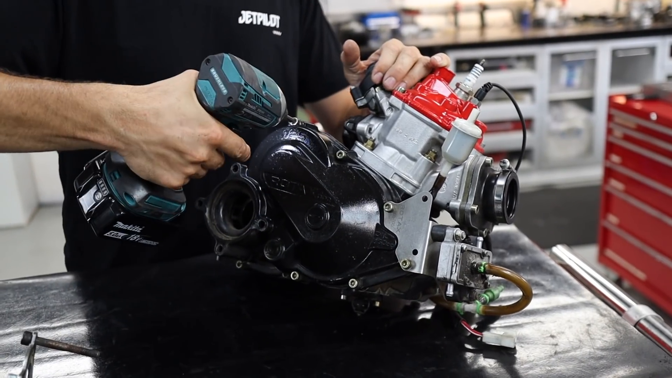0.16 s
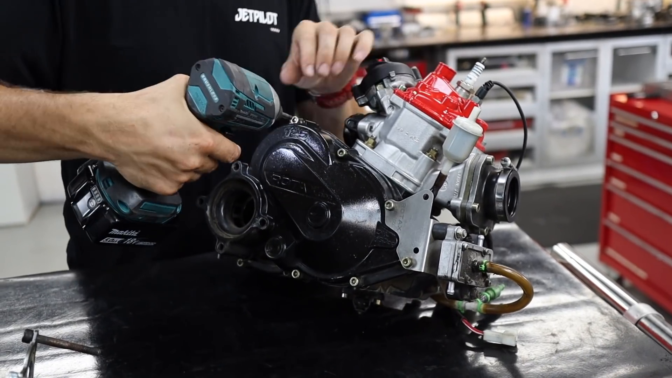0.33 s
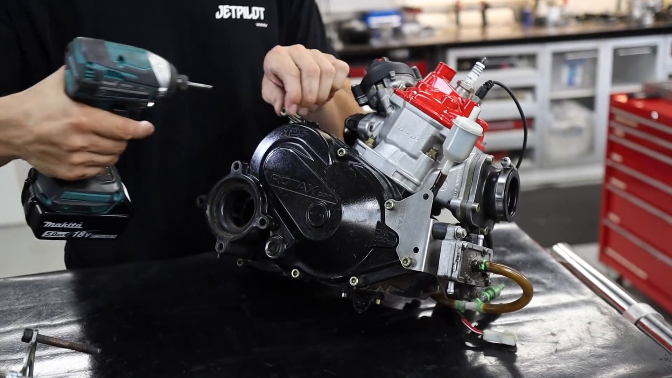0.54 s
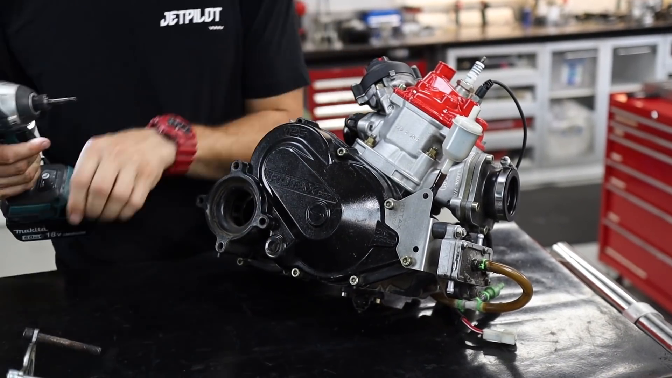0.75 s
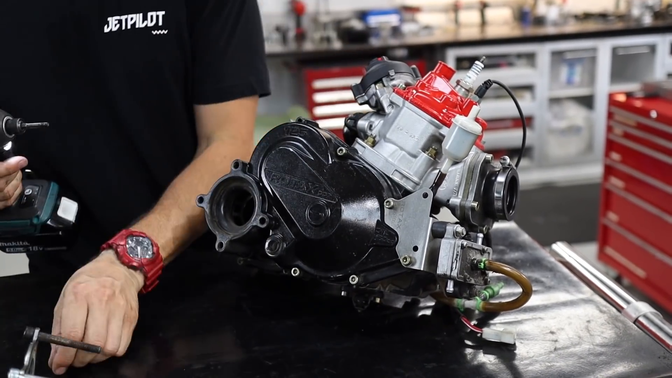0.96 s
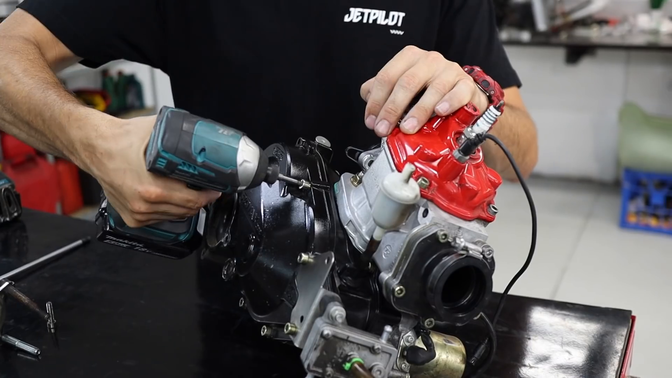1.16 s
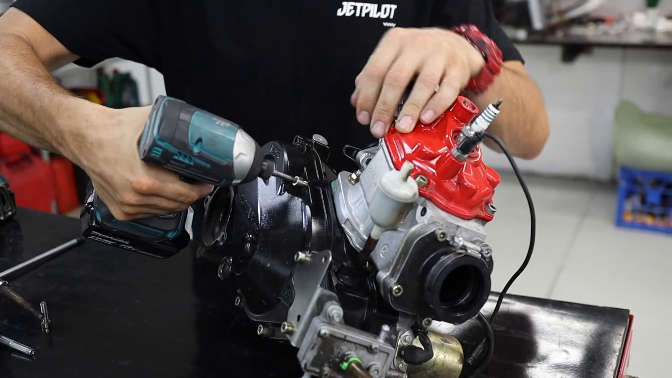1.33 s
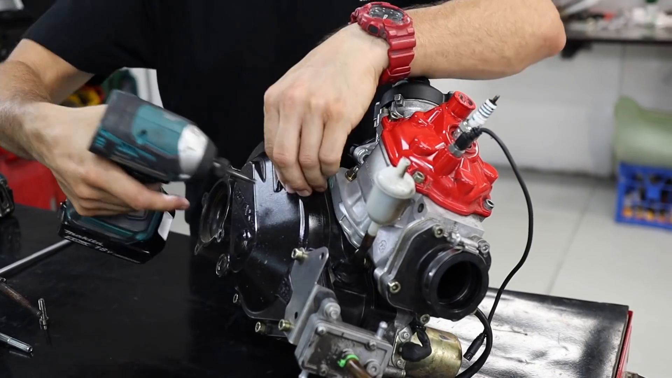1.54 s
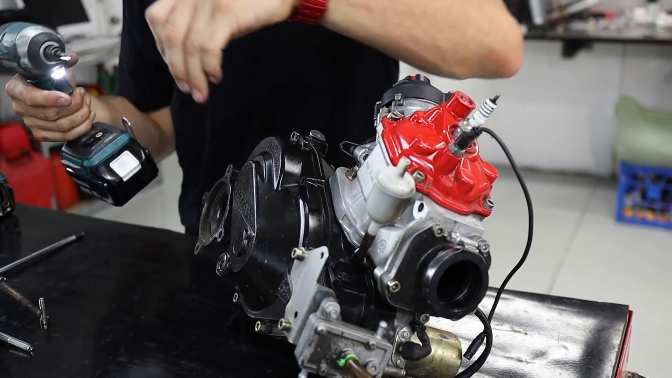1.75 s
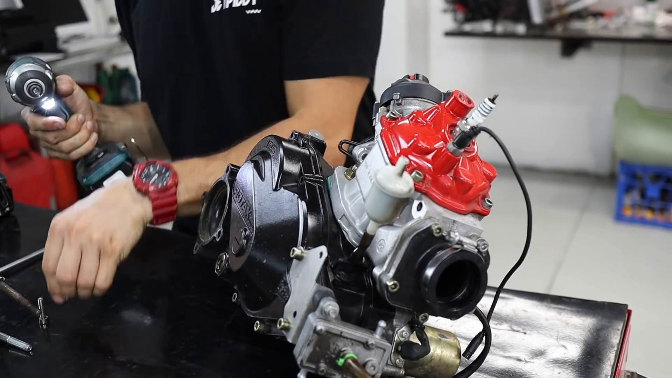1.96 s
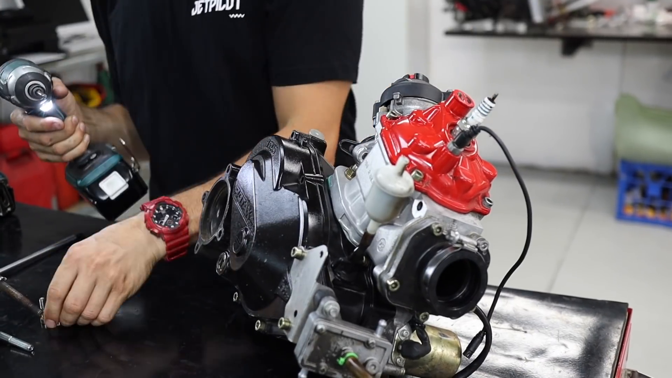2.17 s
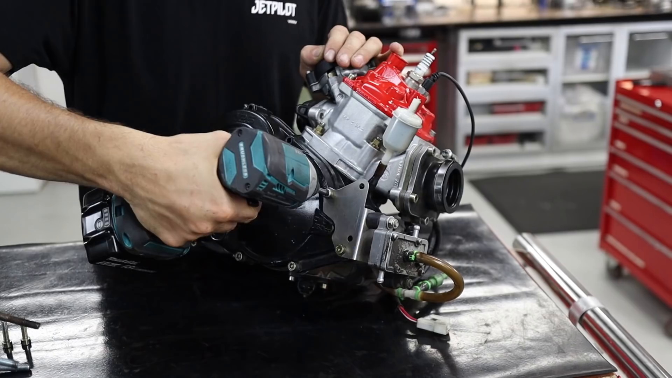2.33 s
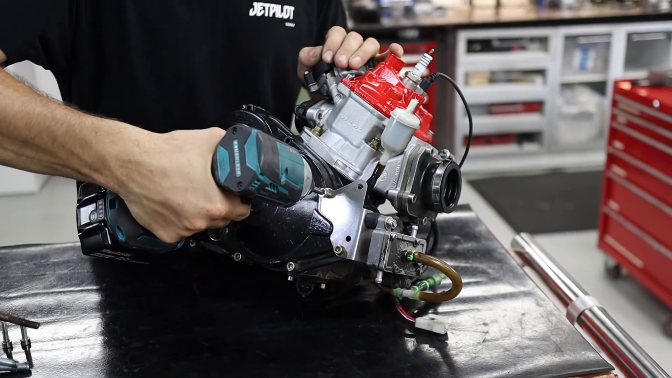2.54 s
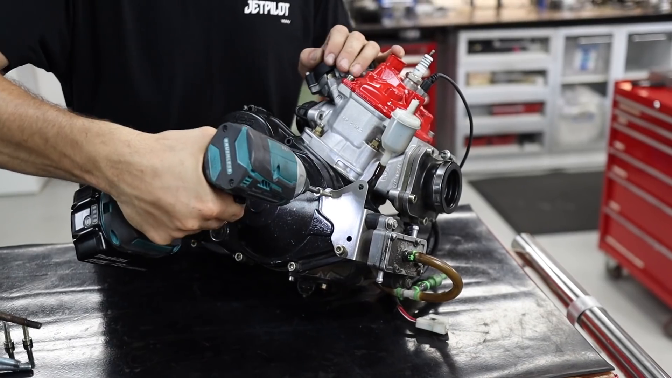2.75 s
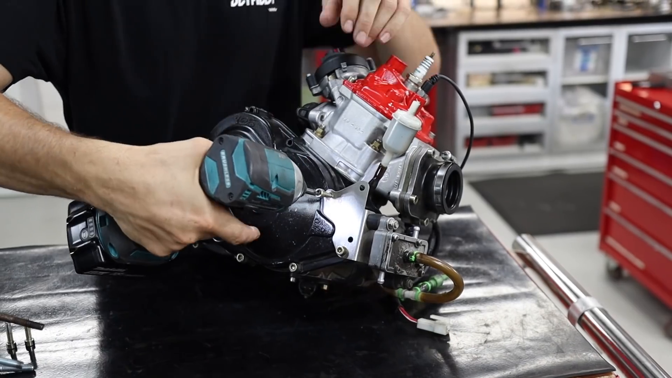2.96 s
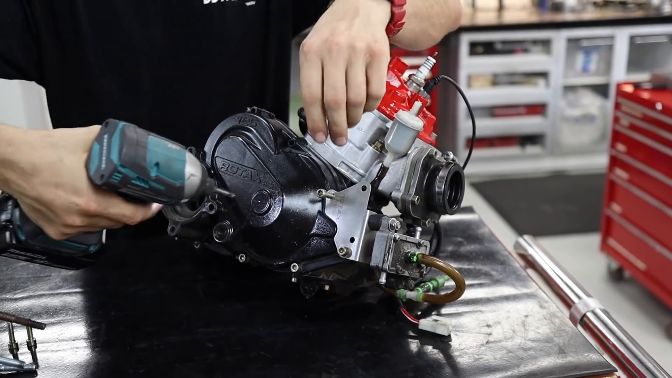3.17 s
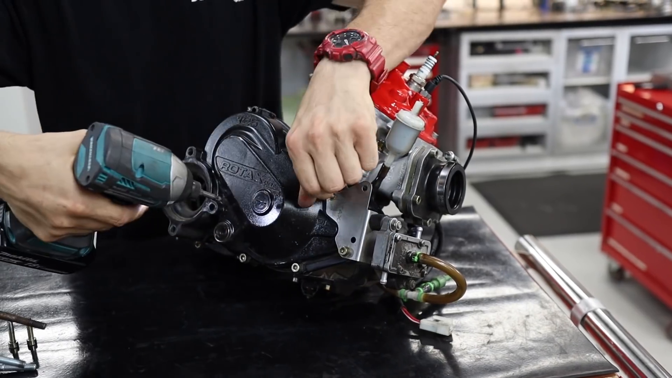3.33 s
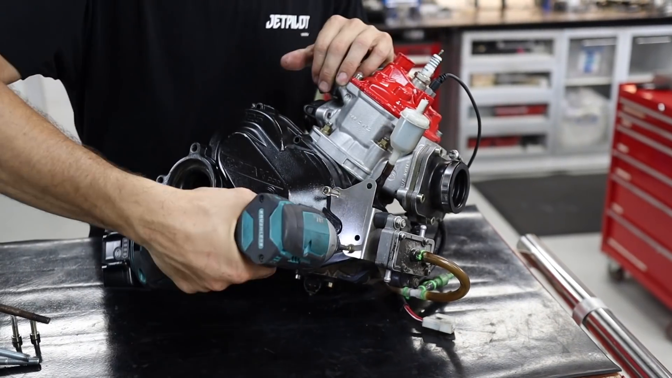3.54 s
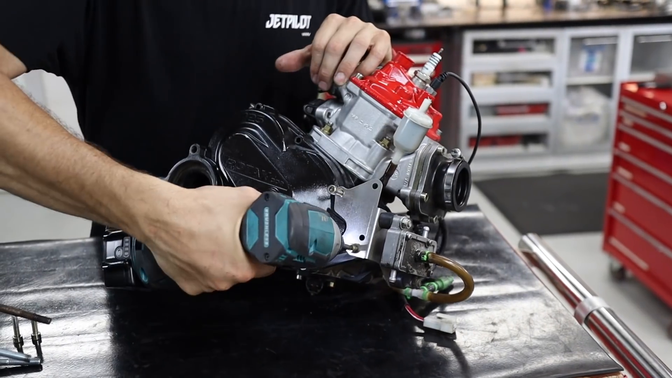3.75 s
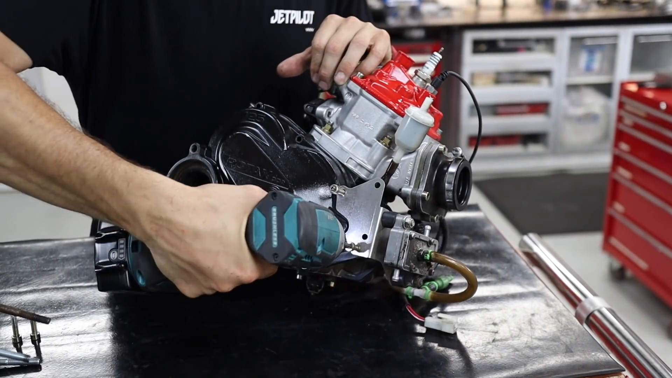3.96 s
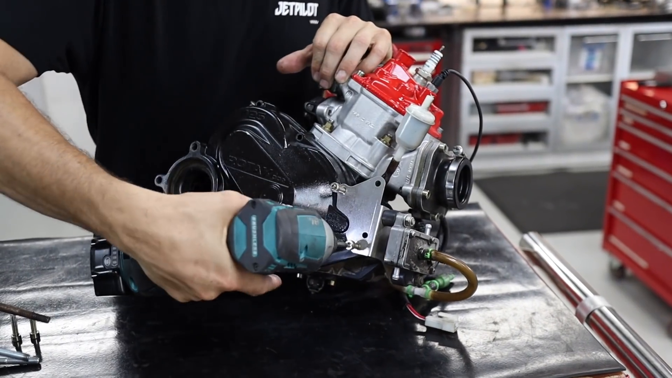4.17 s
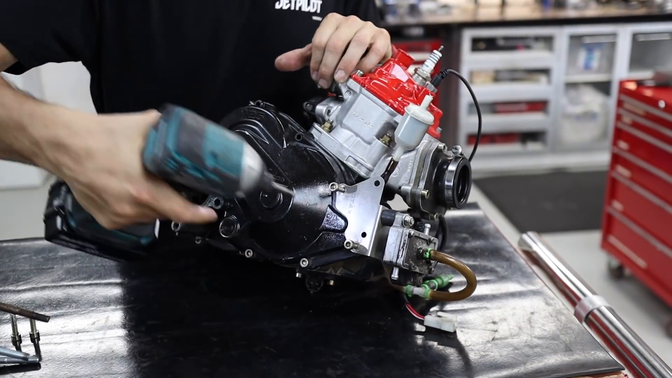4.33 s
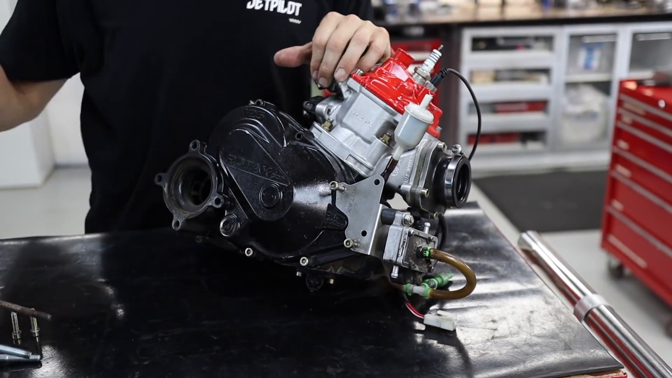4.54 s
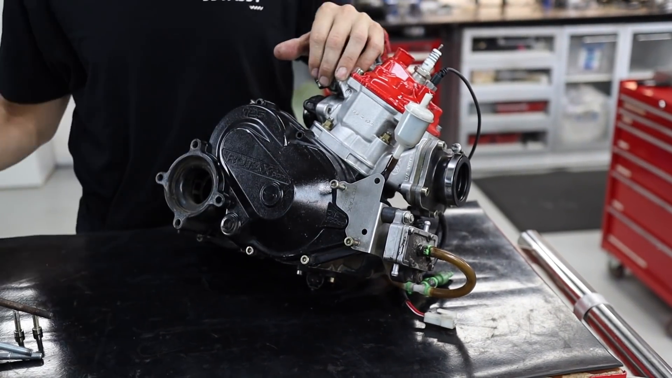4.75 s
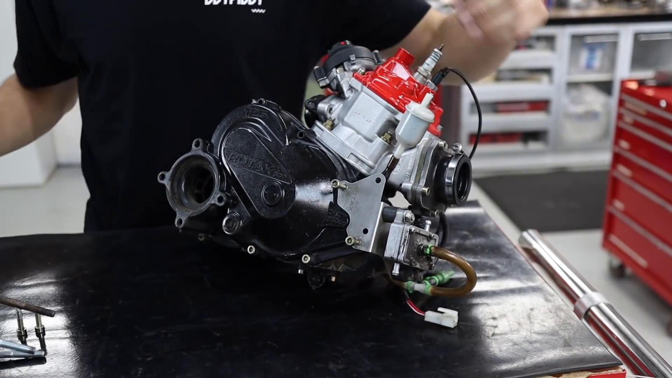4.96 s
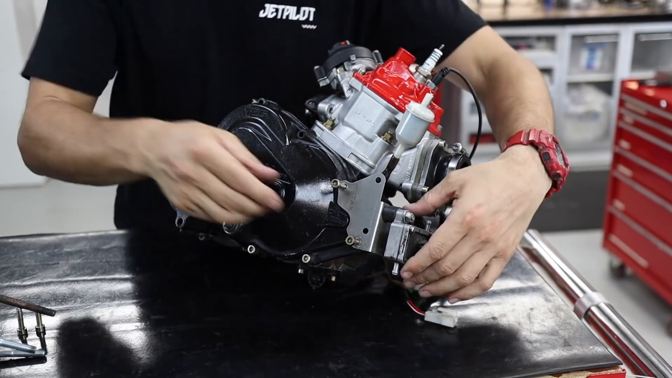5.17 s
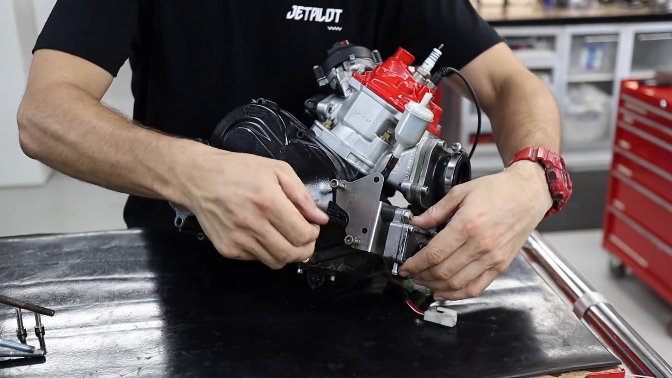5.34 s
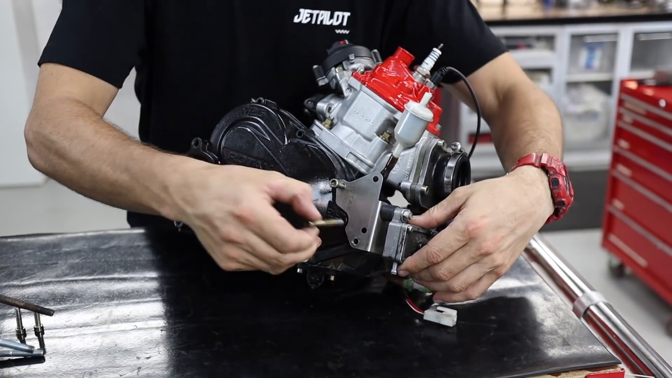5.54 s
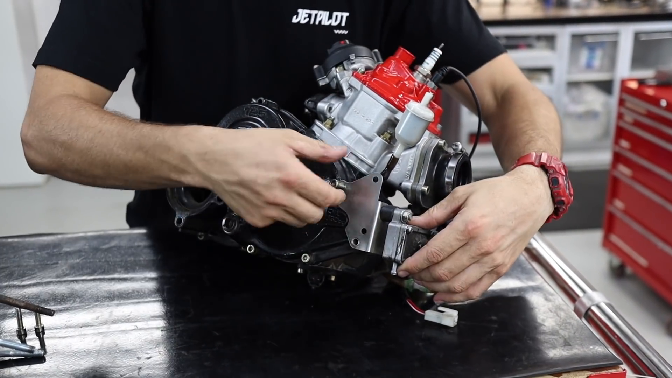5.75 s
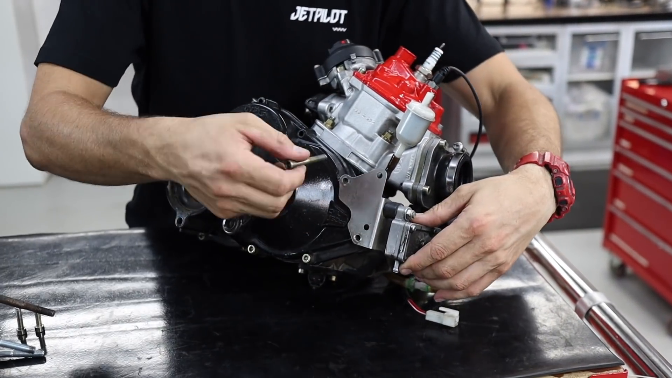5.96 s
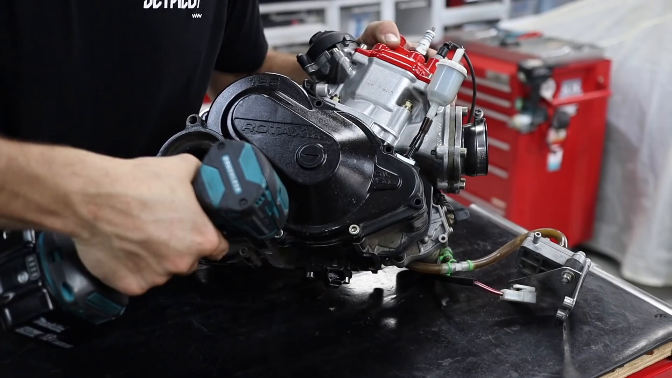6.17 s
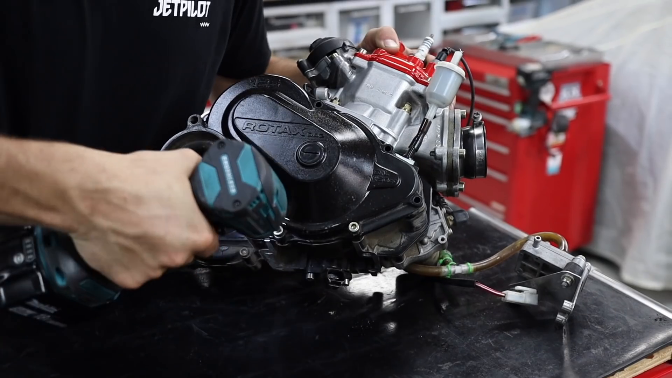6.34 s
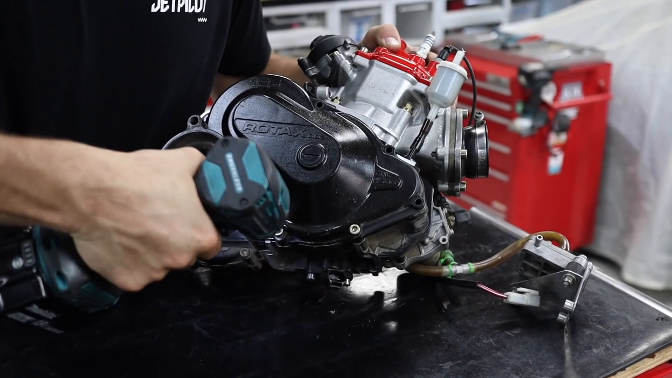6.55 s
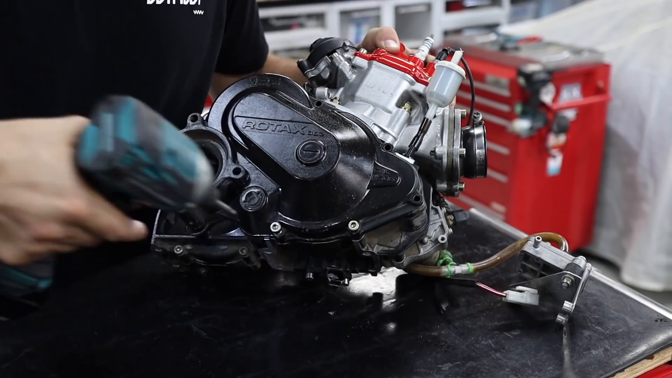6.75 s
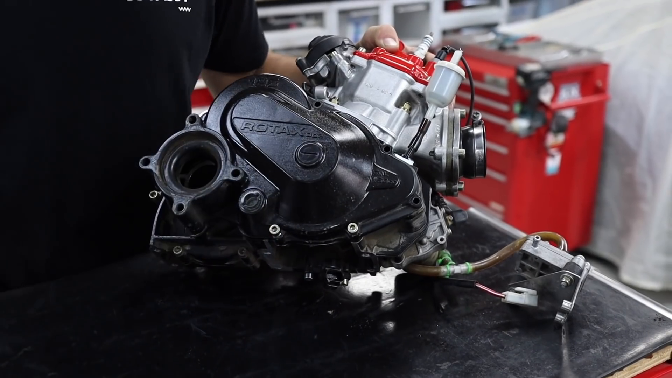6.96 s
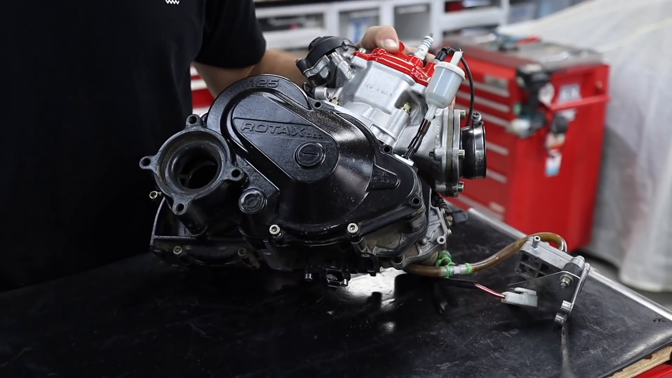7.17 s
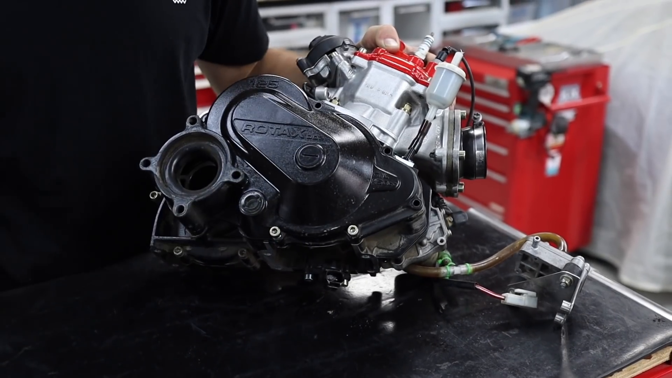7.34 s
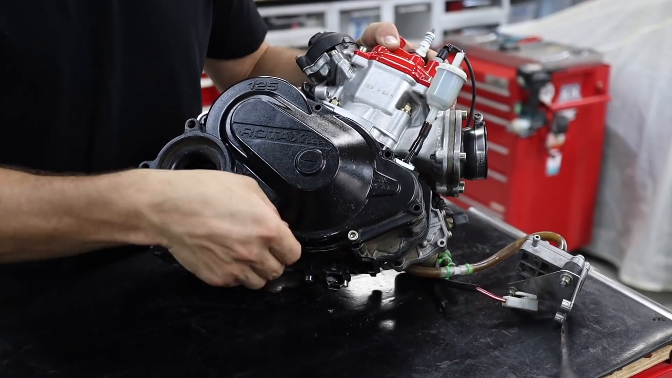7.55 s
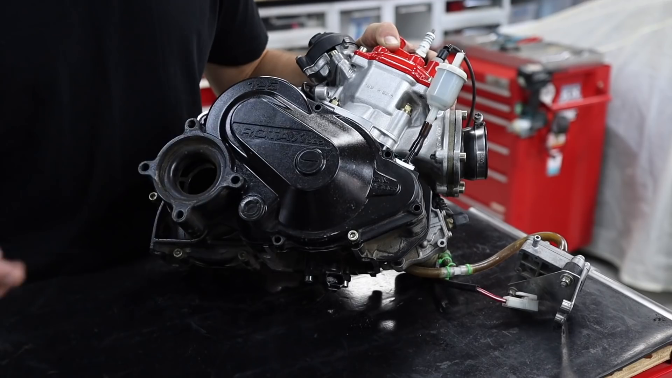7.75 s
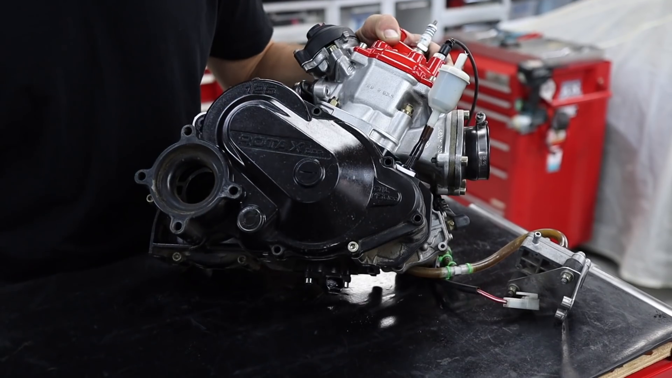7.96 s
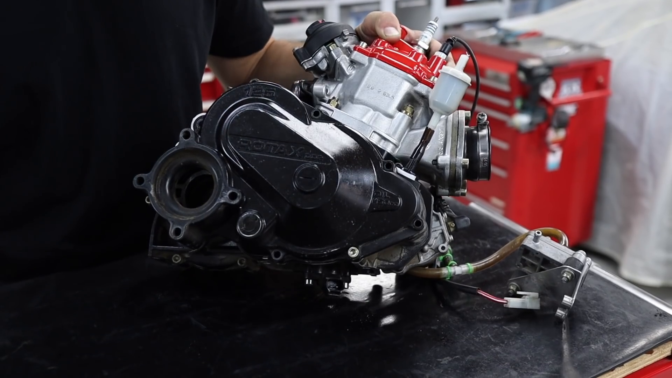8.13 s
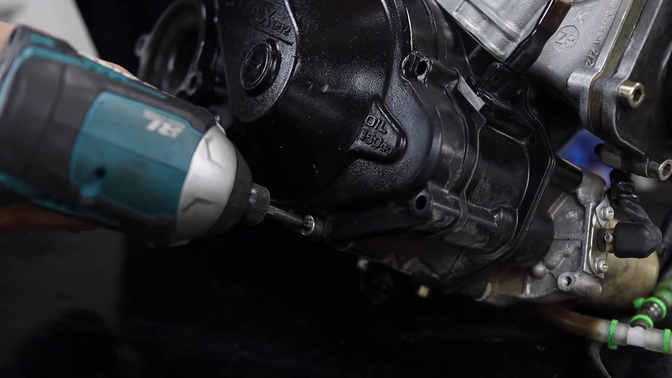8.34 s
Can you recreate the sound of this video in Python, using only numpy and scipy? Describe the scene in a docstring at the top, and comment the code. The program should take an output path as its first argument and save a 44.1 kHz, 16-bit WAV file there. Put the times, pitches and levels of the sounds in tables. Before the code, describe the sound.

Close view of a workshop bench, centred sound, short room reverberation, constant soft ventilation with faint fan tones and low hums swelling early on. At 0 s an impact driver is already spinning and stops almost at once. Light clicks come near 0.6 s and a dull knock at 0.95. From 1.16 to 1.46 s a pull begins with rapid metallic hammer blows, then a high gear whine and rattle. A bolt snaps and pings at 1.7. A longer pull runs 2.5 to 2.9, clicks follow at 3.15 to 3.45, a faint bench thump and shifting rumble around 3.6, then another pull 3.7 to 4.15, its whine rising. The tool is set down with a double clack and thump at 4.8. A steel plate clanks lightly from 5.35, loudest at 5.9. The last pull spans 6.36 to 6.67; the tool lands at 7.16, bolts click around 7.6, and a soft knock falls at 8.1.

```python
"""An impact driver undoes the bolts of a small engine on a bench, amid steady ventilation noise.
Each pull whines and rattles (gear mesh, tooth impacts); from the second on, hammer blows begin it.
Between pulls come clicks, dull knocks, one ringing bolt and bench thumps: noise bursts and decaying modes.
The tool is then set down, a steel plate clanks, a last bolt spins out and the tool is set down again.
Low hums swell and fade in the first half; the room adds one reflection and a diffuse tail."""
import sys
import numpy as np
from scipy import signal
from scipy.fft import rfft, irfft, next_fast_len
from scipy.io import wavfile
from scipy.ndimage import uniform_filter1d

SR = 44100
rng = np.random.default_rng(int(sys.argv[2]) if len(sys.argv) > 2 else 0)


def generate_wav(signal):
    """Clip the signal to [-1, 1] and save it as 16-bit WAV at the path in sys.argv[1]."""
    frames = np.transpose(np.atleast_2d(signal))
    scaled = np.clip(frames, -1, 1) * 32767
    pcm = np.round(scaled).astype(np.int16)
    wavfile.write(sys.argv[1], SR, pcm)


N = 374850
TIME = np.arange(N) / SR
# response of the engine casing shaken on the bench: (frequency [Hz], gain [dB])
CASING_SPECTRUM = [(35, -18), (65, -2.5), (90, -1), (130, 1.5), (190, 0), (270, -3), (450, -19),
                   (900, -39.5)]


def from_db(db):
    """Logarithmic level: decibels become an amplitude ratio."""
    return 10 ** (np.asarray(db) / 20)


def rms_one(x):
    """Normalisation: the mean square becomes one."""
    return x / np.sqrt(np.mean(x ** 2) + 1e-20)


def drift(rate):
    """Slow random modulation: joined random knots of unit rms, turning about rate times a second."""
    knots = rng.standard_normal(int(2 * rate * N / SR) + 3)
    return rms_one(np.interp(2 * rate * TIME, np.arange(len(knots)), knots))


def colour(x, spectrum):
    """Minimum-phase filtering: the folded cepstrum gives a causal response through (Hz, dB) points."""
    size = 2 * next_fast_len(len(x))
    octave = np.log2(np.maximum(np.fft.rfftfreq(size, 1 / SR), 10))
    hz, db = np.transpose(spectrum)
    log_gain = np.log(from_db(np.interp(octave, np.log2(hz), db)))
    cepstrum = irfft(log_gain)
    cepstrum[1:size // 2] *= 2
    cepstrum[size // 2 + 1:] = 0
    response = np.exp(rfft(cepstrum))
    return irfft(rfft(x, size) * response)[:len(x)]


def tone(hz, width_hz):
    """Phase diffusion: a random walk of phase broadens a unit-power sine into a narrow band."""
    wander = np.sqrt(2 * np.pi * abs(width_hz) / SR) * uniform_filter1d(rng.standard_normal(N), size=40)
    return np.sqrt(2) * np.sin(np.cumsum(2 * np.pi * hz / SR + wander))


def add(out, s, sound):
    """Superposition: a sound is summed into the mix from time s."""
    at = int(np.clip(s * SR, 0, N - 1))
    out[at:at + len(sound)] += sound[:N - at]


def strikes(rows, spectrum, t60, rise_s, tail_db, tail_t60, bass_hz=1000, treble_hz=9000):
    """Dense modal decay: each contact (s, dB, brightness dB) is a coloured noise burst with a weak tail."""
    out, t = np.zeros(N), np.arange(SR // 3) / SR
    decay = from_db(-60 * t / t60) + from_db(tail_db - 60 * t / tail_t60)
    envelope = (1 - np.exp(-t / rise_s)) * decay
    for s, db, bright_db, *_ in rows:
        burst = colour(envelope * rng.standard_normal(len(t)), spectrum)
        burst = rms_one(burst) * np.sqrt(np.mean(envelope ** 2))
        # positive brightness lifts the treble and lowers the bass
        tilt = [(bass_hz, -bright_db), (treble_hz, bright_db)]
        add(out, s, from_db(db) * colour(burst, tilt))
    return out


def ringing(rows, modes, others_db, spread_db=5.5, rise_s=0.00083, middle_hz=4500):
    """Modal synthesis: each touch excites decaying sines; others_db shifts those far from its given one."""
    out, t = np.zeros(N), np.arange(SR // 3) / SR
    for s, db, bright_db, favoured_hz in rows:
        for hz, mode_db, t60 in modes:
            apart = min(3 * abs(np.log2(hz / favoured_hz)), 1)   # reaches 1 a third of an octave away
            tilt_db = bright_db * np.clip(np.log2(hz / middle_hz), -1, 1)
            strength_db = db + mode_db + tilt_db + others_db * apart
            strength_db += spread_db * rng.standard_normal()
            envelope = (1 - np.exp(-t / rise_s)) * from_db(strength_db - 60 * t / t60)
            add(out, s, envelope * np.sin(2 * np.pi * (hz * t + rng.random())))
    return out


def trigger(start, free, stop, creep_db=-30, labour_db=-3.5, stall_db=-12, spin_up_s=0.025,
            brake_s=0.018, ease_s=0.028, ease_db=-0.95):
    """Load and speed envelope: gear level through creep, wind-up, labour, free spin and braking."""
    shape = [(start - .05, -70), (start - .038, creep_db), (start - .016, creep_db),
             (start - .002, labour_db), (free - .02, labour_db - 8), (free, stall_db),
             (free + spin_up_s, ease_db), (free + spin_up_s + ease_s, 0),
             (stop - ease_s, 0), (stop, ease_db), (stop + brake_s, -24), (stop + 2 * brake_s, -70)]
    s, db = np.transpose(shape)
    level_db = np.interp(TIME, np.maximum.accumulate(s), db)
    return from_db(level_db) * (TIME > s[0]) * (TIME < s[-1])


def chatter(per_s, spread_db):
    """Random impulse train: teeth and threads slap through their play with uneven force."""
    impulses = (rng.random(N) < per_s / SR) * rng.standard_normal(N)
    return rms_one(impulses * from_db(spread_db * drift(260)))


def gears():
    """Gear mesh: tones at multiples of the tooth rate ride on rattle, thread rumble and casing shake."""
    # trigger pulls: (motor wound up [s], bolt free [s], trigger let go [s], tooth mesh when free [Hz],
    # then relative levels: rattle [dB], rumble [dB], casing shake [dB], growl [dB], whine [dB],
    # swell of the whine by the end [dB])
    pulls = [(-.3, -0.202, 0.045, 1628, -12.5, -26, -27, -37, -26.5, 0.5),
             (1.159, 1.222, 1.457, 1644, -14.5, -25, -39.5, -39, -33, 1.5),
             (2.479, 2.546, 2.9315, 1635, -13.5, -31, -41, -38.5, -28.5, 2.5),
             (3.734, 3.775, 4.141, 1617, -13, -28.5, -40.5, -35, -34.5, 13),
             (6.366, 6.418, 6.662, 1608, -12, -28.5, -35.5, -28, -33.5, 4)]
    # overtones: (multiple of the mesh rate [1], relative level [dB], line width [Hz])
    gear_tones = [(3, -2, 105), (5.33, -18, 70), (7.4, -22, 60)]
    # response of the gearbox: (frequency [Hz], gain [dB])
    gearbox = [(500, -30), (2700, -13.5), (3700, -8), (4300, -4), (4600, -3), (5100, -0.5), (5600, -1.5),
               (6400, -7), (8500, -7), (9400, -18), (10800, -23.5), (13000, -16.5), (15500, -24.5)]
    # response of the bolt in its thread: (frequency [Hz], gain [dB])
    thread = [(150, -16.5), (350, -20), (620, 0), (950, -3), (1700, 2.5), (2600, -4.5), (4000, -16.5)]
    # loosened bolt wobbling: (centre [s], half length [s], change of rumble [dB], change of shake [dB])
    wobbles = [(1.362, .045, 3, 13.5), (2.6, 0.027, 2, 6), (4.073, 0.055, 4, -4), (6.619, 0.059, 4.5, 0.5)]
    speed_up_hz_per_s = 295   # rise of the mesh rate as the thread lets go
    drive_hz, drive_db, drive_lead_s = 8030, -47.5, 0.012   # whistle of the motor drive
    whine_fade_s = 0.038   # gear tones fade as the trigger is eased

    running = sum(trigger(*pull[:3]) for pull in pulls)
    # each moment takes its settings from the pull whose bolt breaks free nearest to it
    nearest = np.argmin([abs(TIME - pull[1]) for pull in pulls], axis=0)
    settings = np.array(pulls)[nearest].T
    start, free, stop, free_hz, rattle_db, rumble_db, shake_db, growl_db, whine_db, swell_db = settings
    spun_s = np.clip(TIME - free, 0, stop - free)
    mesh_hz = (free_hz + speed_up_hz_per_s * spun_s) * (1 + 0.00191 * drift(40))
    whine_db = whine_db + swell_db * spun_s / (stop - free)
    for s, half_s, more_rumble_db, more_shake_db in wobbles:
        wobble = np.exp(-((TIME - s) / half_s) ** 2)
        rumble_db = rumble_db + more_rumble_db * wobble
        shake_db = shake_db + more_shake_db * wobble

    growl = from_db(growl_db) * tone(mesh_hz, width_hz=153)
    whine = from_db(whine_db + 3.9 * drift(80)) * tone(2 * mesh_hz, width_hz=70)
    load_db = (rattle_db + whine_db) / 2   # the overtones follow both load and whine
    overtones = 0
    for multiple, db, width_hz in gear_tones:
        level_db = load_db + db + 2 * drift(70) + 1.5 * drift(5)
        overtones = overtones + from_db(level_db) * tone(multiple * mesh_hz, width_hz)
    rattle = from_db(rattle_db - 5.5) * rms_one(colour(chatter(per_s=14000, spread_db=1.0), gearbox))
    rumble = from_db(rumble_db - 1.5) * rms_one(colour(chatter(per_s=2500, spread_db=3.0), thread))
    shake = from_db(shake_db - 3.5) * rms_one(colour(rng.standard_normal(N), CASING_SPECTRUM))
    drive_on = (TIME > start - drive_lead_s) * (TIME < stop)
    drive = from_db(drive_db) * drive_on * tone(drive_hz, width_hz=20)
    # whine and overtones die away before the rattle does
    clear = np.clip((stop - TIME) / whine_fade_s, 0, 1) ** .5
    noises = rattle + rumble + shake
    return drive + running * (growl + running * clear * (whine + overtones) + noises)


def background():
    """Broadband flow noise and narrow bands: ventilation, two wavering fan tones and passing hums."""
    # ventilation noise: (frequency [Hz], gain [dB])
    air_spectrum = [(13, -42), (22, -10.5), (70, -9), (97, -9), (124, -3.5), (168, -4), (209, -9),
                    (290, -6), (643, -11), (918, -11), (2470, -24.5), (2990, -27), (5620, -34.5),
                    (7810, -34.5), (15500, -42)]
    # fan: (frequency [Hz], level [dB], line width [Hz])
    fan_tones = [(97.3, -55, 5), (166.6, -58, 6)]
    # hums: (start [s], end [s], pitch at the start [Hz], pitch at the end [Hz], level [dB])
    hum_table = [(.25, .97, 62.9, 68.4, -39.5), (1.8, 2.3, 167.5, 167, -47.5), (4.05, 4.3, 67.4, 67.4, -46)]
    air_db, fan_waver_db, hum_fade_s = -44, 2, 0.19

    air = from_db(air_db + .5 * drift(4.1)) * rms_one(colour(rng.standard_normal(N), air_spectrum))
    fan = sum(from_db(db + fan_waver_db * drift(1.0)) * tone(hz, width_hz)
              for hz, db, width_hz in fan_tones)
    hums = 0
    for start, end, start_hz, end_hz, db in hum_table:
        fade = np.interp(TIME, [start - hum_fade_s, start, end, end + hum_fade_s], [0, 1, 1, 0])
        pitch_hz = np.interp(TIME, [start, end], [start_hz, end_hz])
        hums = hums + fade * from_db(db) * tone(pitch_hz, width_hz=0.77)
    return air + fan + hums


def clicking():
    """Double contact: a bolt or bit lands on one edge, then falls flat on the casing."""
    # clicks: (time [s], relative level [dB], brightness [dB], first touch re the click [dB], t60 [s])
    clicks = [(.588, -29, 8, 0.5, 0.03), (0.616, -24.5, 14.5, -5, 0.025), (3.1467, -29, -8.5, -1, 0.024),
              (3.3647, -18.5, -8, -27, 0.018), (3.407, -13.5, -2.5, -7, 0.057),
              (3.444, -0.5, -1, -9, 0.017), (4.9473, -25, 0, -11, 0.011), (6.9617, -34.5, 3, -15, 0.016),
              (7.5744, -11, 1, -30, 0.013), (7.6314, -10.5, 4, -21, 0.022), (7.661, -2, 4, -6.5, 0.023),
              (7.671, -7, -3.5, -15, 0.028)]
    # response of the small parts: (frequency [Hz], gain [dB])
    click_colour = [(530, -44), (900, -15), (1180, -5.5), (1480, -12), (1930, 2), (2600, -13.5), (3030, -3),
                    (5440, -3), (7500, -10), (8650, -4.5), (10300, -20.5), (12800, -18), (15500, -30)]
    first_touch_s = .0103   # lead of the first touch
    out = np.zeros(N)
    for s, db, bright_db, first_db, t60 in clicks:
        touches = [(s - first_touch_s, db + first_db, bright_db), (s, db, bright_db)]
        out += strikes(touches, click_colour, t60, rise_s=0.0004, tail_db=-25.0, tail_t60=0.12, bass_hz=1520)
    return from_db(-8) * out


def knocking():
    """Damped impact: dull, short-lived knocks on the cover and the bench."""
    # knocks: (time [s], relative level [dB], brightness [dB])
    knocks = [(0.943, -13, -1), (4.818, -9, 3), (7.159, -19.5, 2.5), (8.122, -13, 2)]
    # response of cover and bench: (frequency [Hz], gain [dB])
    knock_colour = [(88, -29.5), (150, -0.5), (477, -2.5), (844, 0), (1160, -6), (1490, -3), (5520, -29.5),
                    (8710, -29.5), (14000, -59)]
    return from_db(-6) * strikes(knocks, knock_colour, t60=0.021, rise_s=0.00053, tail_db=-14,
                                 tail_t60=0.19, treble_hz=5000)


def hammer_blows():
    """Periodic impact: double strokes weaken as the bolt gives; their tilt shifts as the socket sits tight."""
    # bursts: (first stroke [s], period [s], strokes [1], second hit after [s], relative level [dB],
    # loss per stroke [dB], depth of the first blow [dB], brightness of later blows [dB])
    bursts = [(1.1632, .0175, 3, 0.0043, 1, 4.5, -0.5, 4), (2.481, .036, 3, .0088, .5, 8.5, 7, 7),
              (3.733, .0145, 2, .006, 2.5, 7.5, 5.5, 3.5), (6.359, .0138, 3, .004, -0.5, 3, 1, -1)]
    brighten_s = .0065   # time for the socket to sit tight
    rows = []
    for first, period_s, strokes, second_s, db, loss_db, depth_db, bright_db in bursts:
        for k in range(round(strokes)):
            for late_s in (k * period_s, k * period_s + second_s):
                slack = np.exp(-(late_s / brighten_s) ** 2)
                tilt_db = bright_db * (1 - slack) - depth_db * slack
                rows.append((first + late_s, db - k * loss_db, tilt_db))
    return rows


def hammering():
    """Impact excitation: the hammer strikes the anvil, whose dense modes die fast."""
    # response of the anvil: (frequency [Hz], gain [dB])
    anvil = [(88, -54), (150, -15), (388, -9), (781, -5.5), (985, -6.5), (1480, 0.5), (2600, -8), (3220, 1),
             (3550, -5), (5030, -3.5), (6110, -9), (8490, -5), (10900, -15), (12800, -7), (15500, -19)]
    return from_db(-4.5) * strikes(hammer_blows(), anvil, t60=.023, rise_s=0.00067, tail_db=-24.5,
                                   tail_t60=0.24)


def pinging():
    """Free vibration: a bolt snaps off the socket and rings in its own modes."""
    # snap: (time [s], relative level [dB], brightness [dB], mode the others are set against [Hz])
    snap = [(1.71, -8, 0, 2440)]
    # response of the snap: (frequency [Hz], gain [dB])
    ping_colour = [(710, -47.5), (1200, -23), (1600, -8), (2280, -13), (2380, -18), (2980, -4.5),
                   (4200, 0.5), (5310, -11), (8700, -8.5), (15500, -35)]
    # modes of the bolt: (frequency [Hz], relative level [dB], t60 [s])
    bolt_modes = [(2430, -11.5, 0.12), (3740, -30, .16), (4064, -28, .16), (4440, -25, .14),
                  (4570, -25, .16), (6250, -26, .08), (8500, -14, .08)]
    burst = strikes(snap, ping_colour, t60=.016, rise_s=0.00094, tail_db=-19, tail_t60=0.23)
    return from_db(-5) * burst + from_db(-11.5) * ringing(snap, bolt_modes, others_db=3.5)


def bench(count=3):
    """Impulse response: a soft push booms through the bench modes, repeated as the weight rocks to rest."""
    # weight landing: (time [s], relative level [dB], contact time [s])
    thumps = [(3.531, -25, 0.0032), (4.8164, -10, .0022), (7.151, -16.5, 0.0034)]
    # modes of the bench top: (frequency [Hz], relative level [dB], t60 [s])
    bench_modes = [(48.1, -12, .1), (73, -2, 0.093), (101.3, -0.5, 0.15), (129, 0, 0.094),
                   (160.4, 1, 0.079), (214, -2, 0.069), (263, -2, 0.094), (339, -3, 0.04), (492, -4, 0.059)]
    rock_s, rock_db, rock_loss_db, rock_contact_s = .05, -31, 0.5, 0.0036   # spacing, level, loss each
    push, t = np.zeros(N), np.arange(SR // 2) / SR
    rocks = [(s + (k + 1) * rock_s, rock_db - k * rock_loss_db, rock_contact_s)
             for s, *_ in thumps for k in range(count)]
    for s, db, contact_s in thumps + rocks:
        force = np.sin(np.pi * np.minimum(t / contact_s, 1)) ** 2
        add(push, s, from_db(db) * force / force.sum())
    boom = np.zeros(len(t))
    for k, (hz, db, t60) in enumerate(bench_modes):
        boom += (-1) ** k * from_db(db - 60 * t / t60) * np.sin(2 * np.pi * hz * t)
    return from_db(-2.5) * signal.fftconvolve(push, boom)[:N]


def shifting():
    """Friction noise: the engine rumbles briefly as a hand moves it on the bench."""
    shift_s, shift_half_s, shift_db = 3.62, 0.13, -41.5
    swell = np.exp(-((TIME - shift_s) / shift_half_s) ** 2)
    return from_db(shift_db) * swell * rms_one(colour(rng.standard_normal(N), CASING_SPECTRUM))


def setting_down():
    """Successive impacts: the battery heel lands, the tool tips and stands flat; its socket mode rings."""
    # landings: (heel [s], relative level of the heel [dB], delay until flat [s], relative level then [dB])
    set_downs = [(4.8246, -8, .0275, -10.5), (7.1579, -10.5, .0225, -3.5)]
    # response of the tool body: (frequency [Hz], gain [dB])
    tool_colour = [(350, -27), (600, -7), (1650, -10), (2190, -0.5), (4050, -13.5), (5180, -10),
                   (7590, -10.5), (9570, -6.5), (12400, -9), (14000, -26), (15600, -9)]
    tip_lead_s, tip_db = .007, -13   # light tap before it stands flat
    socket_hz, socket_db, socket_t60 = 15420, -25, .08
    rows = []
    for s, heel_db, flat_s, flat_db in set_downs:
        rows += [(s, heel_db, 0, socket_hz),
                 (s + flat_s - tip_lead_s, tip_db, 0, socket_hz),
                 (s + flat_s, flat_db, 0, socket_hz)]
    clack = strikes(rows, tool_colour, t60=0.018, rise_s=0.00052, tail_db=-17.5, tail_t60=0.19)
    ring = ringing(rows, [(socket_hz, socket_db, socket_t60)], others_db=0)
    return from_db(-7.5) * clack + ring


def plate_touches():
    """Repeated contact: the plate chatters on the casing in a quick, weakening run."""
    # clanks: (time [s], relative level [dB], brightness [dB], touches [1], favoured ring [Hz])
    clanks = [(5.3445, -15.5, -4.5, 1, 2370), (5.5472, -14, 3, 4, 8200), (5.8763, -12, -2, 1, 4380),
              (5.8888, 2.5, 1, 2, 8200), (5.9336, -12, -2, 1, 2370)]
    spacing_s, loss_db = .0075, 1   # from one touch to the next
    return [(s + k * spacing_s, db - k * loss_db, bright_db, ring_hz)
            for s, db, bright_db, touches, ring_hz in clanks for k in range(round(touches))]


def clanking():
    """Plate vibration: each touch gives a noisy clank and rings the plate modes."""
    # response of the clank: (frequency [Hz], gain [dB])
    plate_colour = [(350, -51.5), (600, -18.5), (1710, -5.5), (1830, -7.5), (3610, -4.5), (4310, -1),
                    (4750, -12), (8520, -8.5), (9630, -18), (11200, -14.5), (15500, -20)]
    # modes of the plate: (frequency [Hz], relative level [dB], t60 [s])
    plate_modes = [(1090, -16, .06), (1852, -8, .1), (2372, -9, .09), (3210, -11, .06), (3445, -12, .07),
                   (4278, -12, .07), (4365, -10, .07), (5240, -10, .06), (5523, -5, .07), (6417, -14, .06),
                   (8129, -16, .07), (8220, -19, .06), (8748, -15, .07), (10980, -10, .07),
                   (13440, -14, .08), (14200, -15, .06)]
    touches = plate_touches()
    clank = strikes(touches, plate_colour, t60=0.061, rise_s=0.002, tail_db=-40, tail_t60=0.094, bass_hz=2300)
    return from_db(-10.5) * clank + from_db(-7.0) * ringing(touches, plate_modes, others_db=-5.5)


def workshop(x, wet_db, t60, bench_db, bench_s, treble_t60=.25, split_hz=8000):
    """Reflection and reverberation: a bounce off the bench top, then a diffuse tail whose treble dies first."""
    # colour of the room tail: (frequency [Hz], gain [dB])
    room_colour = [(60, 1), (300, 3), (1500, -2), (5000, -2), (8000, -3), (11000, -5.5), (15000, -10)]
    t = np.arange(SR) / SR
    white = rng.standard_normal(SR)
    lowpass = signal.butter(2, min(split_hz, .4 * SR), fs=SR, output="sos")
    low = signal.sosfiltfilt(lowpass, white)
    tail = low * from_db(-60 * t / t60) + (white - low) * from_db(-60 * t / treble_t60)
    tail *= 1 - np.exp(-t / .008)   # the diffuse field builds up gradually
    tail = colour(tail / np.sqrt(np.sum(tail ** 2)), room_colour)
    bounce = np.interp(TIME - bench_s, TIME, x, left=0)
    return x + from_db(bench_db) * bounce + from_db(wet_db) * signal.fftconvolve(x, tail)[:N]


def scene():
    """Superposition: the sources pass through the room, the background joins; both channels are alike."""
    sources = gears() + clicking() + knocking() + hammering() + pinging()
    sources += bench() + shifting() + setting_down() + clanking()
    mono = workshop(sources, wet_db=-13.0, t60=0.32, bench_db=-29, bench_s=.0017) + background()
    return np.array([mono, mono])


def record(dry):
    """Overload and band limit: peaks beyond full scale are clipped, then the top is cut."""
    cutoff_hz = 15750
    lowpass = signal.ellip(10, .05, 60, cutoff_hz, fs=SR, output="sos")
    return signal.sosfiltfilt(lowpass, np.clip(dry, -1, 1))


dry = scene()
out = record(dry)
generate_wav(out)
```